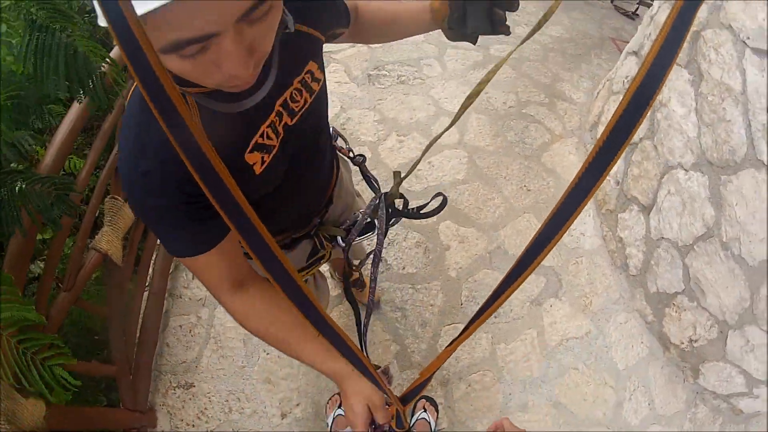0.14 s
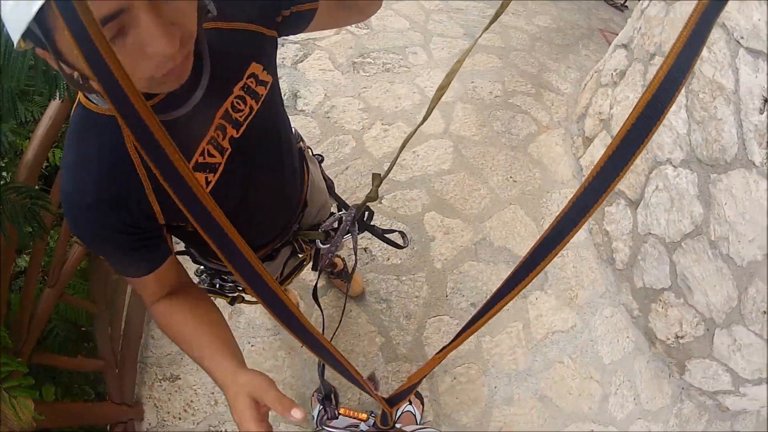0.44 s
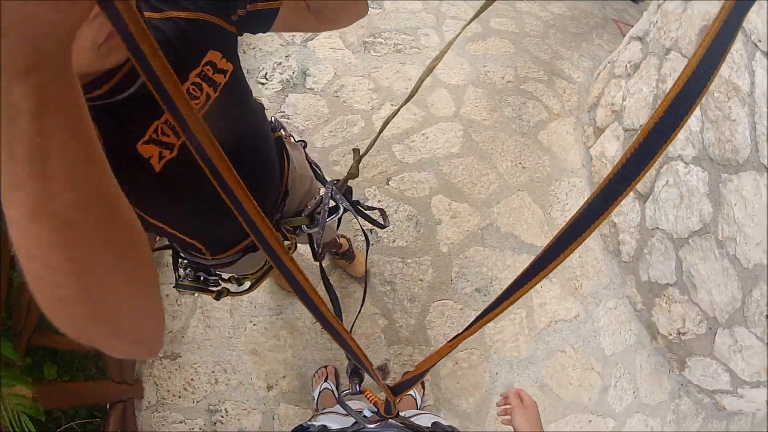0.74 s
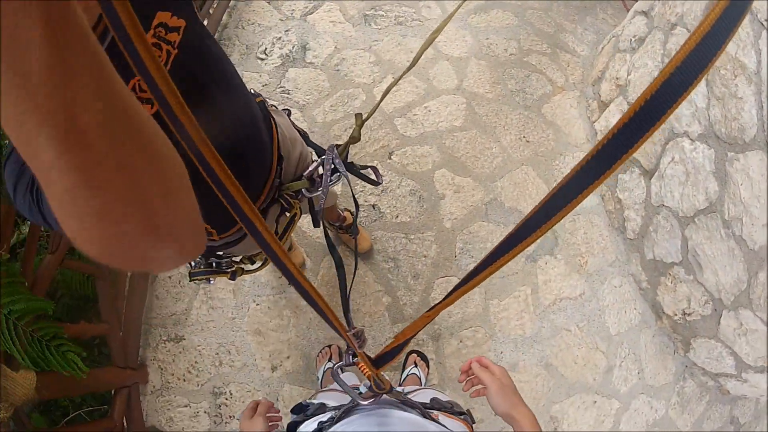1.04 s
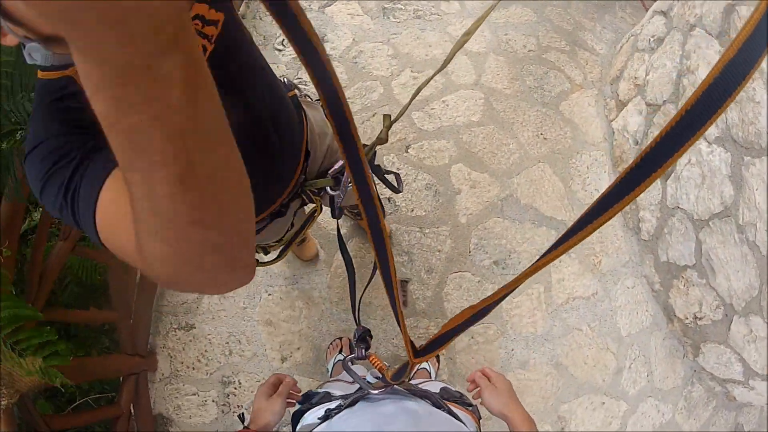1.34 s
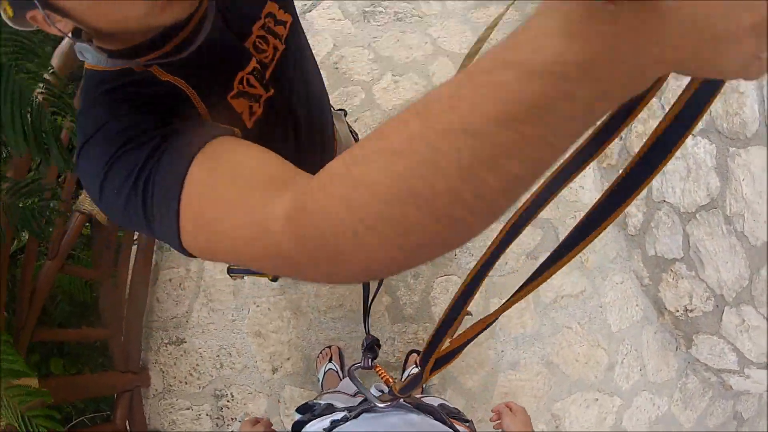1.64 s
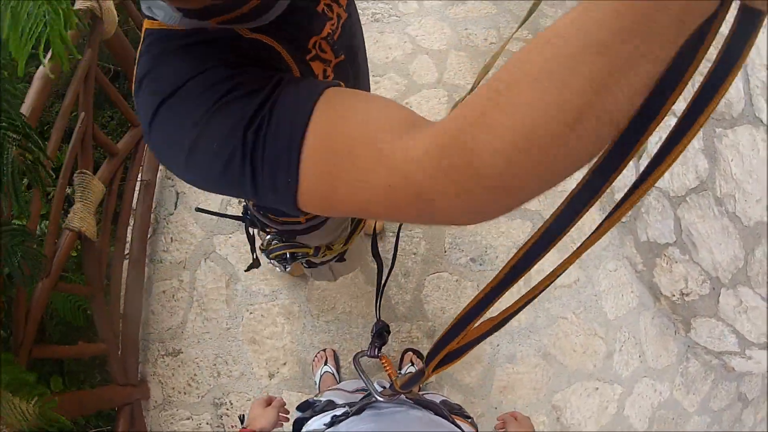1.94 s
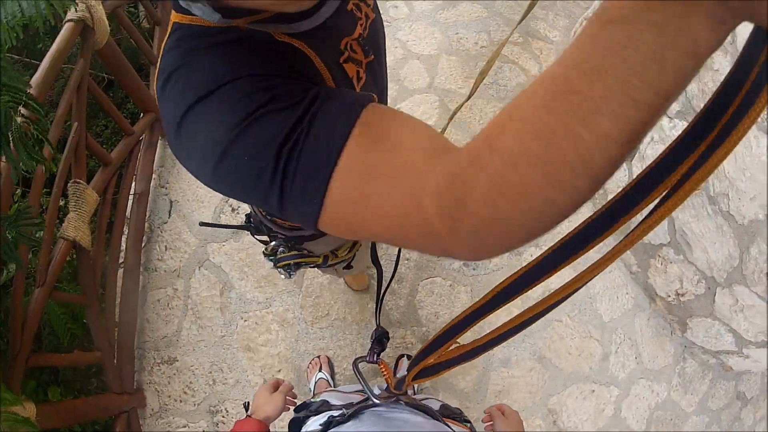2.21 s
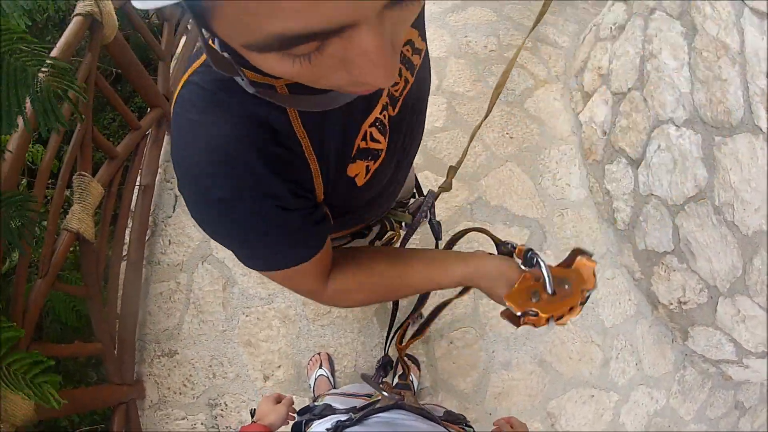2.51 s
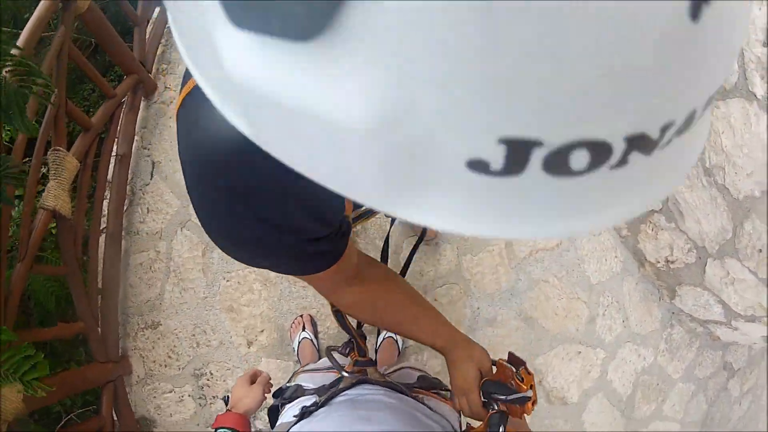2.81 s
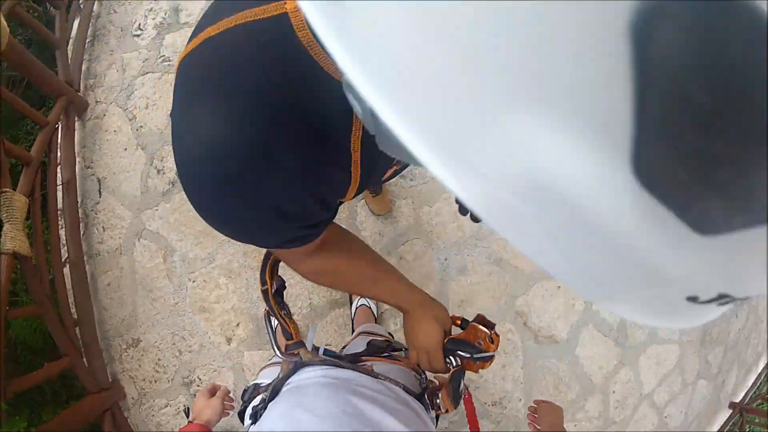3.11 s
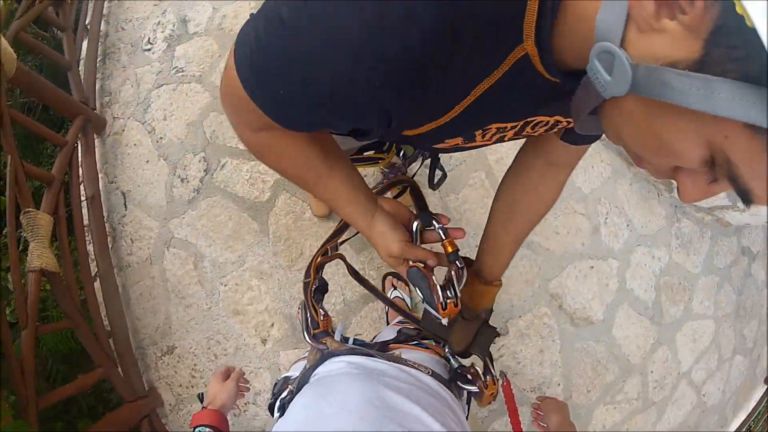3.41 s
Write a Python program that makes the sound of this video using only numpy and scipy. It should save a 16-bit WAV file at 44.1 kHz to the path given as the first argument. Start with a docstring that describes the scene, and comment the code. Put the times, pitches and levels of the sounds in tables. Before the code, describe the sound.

Metal carabiners clink irregularly as a harness is clipped up on an open stone platform. A helmet knocks loudly against the close microphone, then a pulley clacks into place. Faint wind and gear rustle lie underneath.

```python
"""A harness is clipped up for a zip line on an open stone platform, heard from a helmet camera in a case.
Faint air, wind rumble and a far whine are there from the start, and loose gear rustles. From 0.4 s
carabiners clink: each touch makes the metal ring briefly and chatter on. Near 3 s a helmet bumps the
case, overloading the microphone, then bounces and rubs off it. At 3.3 s the pulley clacks home."""
import sys
import numpy as np
from scipy import signal
from scipy.fft import rfft, irfft
from scipy.io import wavfile
from scipy.ndimage import uniform_filter1d

SR = 44100
rng = np.random.default_rng(int(sys.argv[2]) if len(sys.argv) > 2 else 0)


def put_to_file(sound):
    """Save the sound as 16-bit audio at rate SR, in the file named by the first command-line argument."""
    columns = np.atleast_2d(sound).T  # one column per channel
    safe = np.clip(columns, -1, 1)
    whole_steps = np.round(safe * 32767)
    wavfile.write(sys.argv[1], SR, whole_steps.astype(np.int16))


N = 156555

# Outdoor air heard through the case. Each row: frequency in Hz, relative level in dB.
AIR_SPECTRUM = [(130, 3.5), (220, 11.5), (310, -1), (600, -6), (1120, -2), (1450, -7.5), (1850, 1.5),
                (2200, -5.5), (2550, -13.5), (3400, -14), (3900, -18), (5250, -18), (6000, -35.5),
                (6800, -17), (7600, -23.5), (9400, -22), (10100, -13), (11400, -26.5), (12700, -29.5),
                (13900, -15.5), (15100, -28), (15700, -33)]
# How loud the four background sounds are over time. Each row: time in seconds, level in dB.
AIR_LEVELS = [(0, -56.7), (2.5, -58.5), (3.55, -57.5)]
WIND_LEVELS = [(0, -54.5), (1.5, -58.5), (1.8, -53), (2.1, -58.5), (3.55, -55)]
WHINE_LEVELS = [(0, -61.5), (1.4, -72)]
RUSTLE_LEVELS = [(0, -72), (.8, -64), (1.6, -73.5), (2.05, -67), (2.5, -80), (2.9, -71), (3.35, -67.5)]
# The metal's tones heard through the case, in five families from low to high: clack, ping, snap, ring,
# sheen. Each row of a family: frequency in Hz, relative level in dB.
METAL_TONES = {"clack": [(1200, -12.5), (1900, -2), (2150, 0)], "ping": [(2830, 0)], "snap": [(3430, 0),
               (4300, -3)], "ring": [(5080, -3), (5250, 0), (6780, -2), (7600, -10)], "sheen": [(8450, 0),
               (9130, -1), (9950, -4), (14050, -7), (14850, -3)]}
# Carabiner touches. Each row: start in seconds, a level in dB for each of the five families, then the
# chatter's level in dB relative to the touch.
CARABINER_TOUCHES = [(0.375, -22, -25, -16, -21, -23, -3), (0.612, -35, -37, -31, -46, -37, -3),
                     (0.636, -31, -24, -31, -42, -31, -6), (0.738, -24, -33, -33, -42, -33, -4),
                     (0.8855, -28, -37, -45, -52, -38, -3), (0.911, -29, -31, -38, -42, -37, -5),
                     (0.9618, -34, -37, -33, -37, -39, -5), (1.008, -28, -21, -21, -17, -26, -12),
                     (1.056, -28, -29, -32, -33, -34, -8), (1.0712, -35, -34, -31, -29, -37, -4),
                     (1.095, -32, -34, -26, -32, -33, -6), (1.113, -21, -30, -20, -28, -26, -10),
                     (1.118, -16, -15, -18, -23, -20, -10), (1.128, -16, -24, -26, -28, -26, -10),
                     (1.134, -21, -24, -23, -14, -28, -8), (1.166, -24, -22, -28, -31, -28, -9),
                     (1.215, -33, -28, -32, -37, -34, -6), (1.2835, -18, -19, -11, -24, -18, -10),
                     (1.2868, -6, -3, -6, -4, -9, -13), (1.4659, -39, -33, -26, -32, -33, -9),
                     (1.495, -35, -22, -30, -34, -29, -12), (1.7675, -27, -20, -26, -26, -27, -10),
                     (1.783, -24, -25, -29, -26, -31, -10), (1.7895, -11, -13, -14, -14, -17, -8),
                     (1.8635, -20, -25, -19, -20, -29, -10), (1.872, -17, -13, -20, -13, -20, -10),
                     (1.8825, -17, -23, -21, -13, -24, -10), (1.8888, -12, -17, -15, -6, -19, -13),
                     (1.9178, -17, -19, -17, -16, -23, -9), (1.9355, -24, -28, -35, -34, -33, -2),
                     (2.004, -26, -31, -28, -30, -32, -10), (2.0145, -24, -20, -21, -17, -25, -6),
                     (2.039, -20, -25, -20, -26, -25, -9), (2.055, -26, -43, -33, -40, -35, 5),
                     (2.068, -16, -21, -23, -20, -25, -8), (2.097, -14, -19, -21, -24, -23, -7),
                     (2.136, -29, -30, -31, -27, -35, -3), (2.2325, -14, -20, -19, -13, -23, -12),
                     (2.2485, -22, -18, -25, -17, -25, -10), (2.2565, -23, -27, -25, -22, -31, -4),
                     (2.299, -41, -42, -31, -29, -42, 3), (2.3145, -24, -30, -27, -11, -34, -16),
                     (2.3606, -29, -33, -39, -45, -38, -8), (2.6293, -37, -39, -34, -43, -39, -2),
                     (2.882, -39, -41, -39, -39, -42, -2), (3.2749, -28, -31, -35, -29, -36, -2)]
# Helmet blows on the case. Each row: start in seconds, thud level in dB, thud pitch in Hz, seconds for
# the thud to fade by 60 dB, level of the camera mount's ring in dB, crack level in dB.
HELMET_BLOWS = [(2.9754, 11, 184, .017, -15, -12.5), (2.9811, -4.5, 151, 0.014, -35, -20.5),
                (3.0081, 1, 310, .016, -16, -16)]
# The noise the case makes when touched. Each row: frequency in Hz, relative level in dB.
CASE_SPECTRUM = [(100, 3.5), (450, 9.5), (800, -2), (1000, -20), (1250, -7), (1500, -13), (2250, -4.5),
                 (4200, -25), (6000, -46), (8500, -27), (9800, -15), (10700, -28), (12000, -6.5),
                 (13200, -26), (14300, -20), (16000, -38)]
# The microphone's thin high ring when the case is knocked.
# Each row: frequency in Hz, level in dB, seconds to fade by 60 dB.
MIC_TONES = [(11950, -40, .06)]
# The mount's pitch rises as the helmet leans on it and falls as it lets go.
# Each row: time in seconds, pitch in Hz.
MOUNT_PITCHES = [(3.0, 240), (3.062, 300), (3.074, 235)]
# The pulley clacking home: one row, laid out like a carabiner touch.
PULLEY_TOUCH = (3.2958, -8, -18, -16, -10, -18, -1)

# A name with T60 is the time a sound takes to fade by 60 dB.
CONTACT_S, BOUNCE_S, RING_T60_S = .0009, .0017, .045
CARABINER_T60_S, PULLEY_T60_S, PLATFORM_T60_S = .052, .1, .18
MOUNT_T60_S, CRACK_T60_S, RATTLE_T60_S = .11, .016, .1


def undb(db):
    """Turn decibels into a gain."""
    return 10 ** (np.asarray(db) / 20)


def unit(x):
    """Scale to an average power of 1."""
    return x / np.sqrt(np.mean(x ** 2))


def norm(x):
    """Scale to a total energy of 1."""
    return x / np.sqrt(np.sum(x ** 2))


def fade(t, t60):
    """Die away by 60 dB every t60 seconds."""
    return np.exp(-np.log(1000) * t / t60)


def swell(t, rise_s, fall_s):
    """Grow until t = 0, then die away."""
    return np.exp(np.minimum(t / rise_s, -t / fall_s))


def follow(t, table):
    """Join a table's (time, value) rows with straight lines."""
    return np.interp(t, *np.array(table).T)


def add(out, start, x):
    """Mix x in at start seconds."""
    i = int(start * SR)
    out[i:i + len(x)] += x[:N - i]


def low_noise(hz, order=1):
    """Noise that weakens above hz."""
    return signal.sosfilt(signal.butter(order, hz, fs=SR, output="sos"), rng.standard_normal(N))


def band_noise(hz, width_hz):
    """Noise gathered around one pitch."""
    band = signal.butter(2, [hz - width_hz / 2, hz + width_hz / 2], "band", fs=SR, output="sos")
    return unit(signal.sosfilt(band, rng.standard_normal(N)))


def shaped_noise(spectrum):
    """Noise shaped by (Hz, dB) rows."""
    hz, db = np.array(spectrum).T
    freqs = np.maximum(np.fft.rfftfreq(N, 1 / SR), 1)
    gains = undb(np.interp(np.log(freqs), np.log(hz), db))
    return unit(irfft(rfft(rng.standard_normal(N)) * gains, N))


def wander(per_s):
    """A smooth random drift, about 1 in size."""
    hold = int(SR / per_s)
    steps = np.repeat(rng.standard_normal(N // hold + 1), hold)
    return unit(uniform_filter1d(uniform_filter1d(steps, hold), hold)[:N])


def outdoors(t):
    """Steady air, wind rumbling on the case, a far whine that fades and one brief low hum."""
    air = shaped_noise(AIR_SPECTRUM) * undb(follow(t, AIR_LEVELS) + .43 * wander(15))
    wind = unit(low_noise(hz=43.6, order=2)) * undb(follow(t, WIND_LEVELS) + .5 * wander(4.7))
    hum_hz = 218 * (1 + .0388 * wander(50.9))
    hum_shape = np.exp(-((t - 1.39) / .041) ** 2 / 2)  # peaks at 1.39 s
    hum = np.sin(2 * np.pi * np.cumsum(hum_hz) / SR) * hum_shape
    whine = band_noise(hz=1088, width_hz=100) * undb(follow(t, WHINE_LEVELS))
    return air + wind + whine + undb(-50 + 2 * wander(39.5)) * hum


def metal_ring(push, levels_db):
    """Pushed metal held in the hand: each tone sounds for a few milliseconds and leaves a faint ring."""
    t = np.arange(SR // 12) / SR
    contact = np.exp(-t / CONTACT_S)
    shape = t / CONTACT_S * contact + undb(-27) * fade(t, RING_T60_S) * (1 - contact)
    out = 0
    for family, level_db in zip(METAL_TONES.values(), levels_db):
        hz, db = np.array(family).T
        size, detune, phase = rng.standard_normal((3, len(hz)))  # no two touches sound alike
        tones = shape * np.sin(2 * np.pi * (np.outer(hz * (1 + .009 * detune), t) + phase[:, None]))
        ringing = signal.fftconvolve(push[None], tones, axes=1)
        blend = sum(gain * norm(x) for gain, x in zip(undb(db + 1.5 * size), ringing))
        out = out + undb(level_db) * norm(blend)
    return out


def gear_rustle(t):
    """Loose gear jostles: about 900 tiny ticks a second set the metal ringing."""
    ticks = (rng.random(N) < 900 / SR) * rng.uniform(-1, 1, N)
    usual_db = np.mean([row[1:-1] for row in CARABINER_TOUCHES], axis=0)
    return unit(metal_ring(ticks, usual_db)[:N]) * undb(follow(t, RUSTLE_LEVELS))


def platform_echo(t, gear):
    """The stone scatters the gear's sound back as a short, duller echo."""
    scatter = norm(low_noise(hz=5000) * fade(t, PLATFORM_T60_S))
    return undb(-22) * signal.fftconvolve(gear, scatter)[:N]


def clinks(touches, chatter_t60):
    """Each touch and its quick bounces ring the metal; the parts then chatter against each other."""
    out = np.zeros(N)
    t = np.arange(SR // 12) / SR
    for start, *levels_db, chatter_db in touches:
        bounces, shake = rng.standard_normal((2, len(t)))
        push = undb(1) * norm(bounces ** 3 * np.exp(-t / BOUNCE_S))
        push[0] += 1  # the first hit
        shake *= fade(t, chatter_t60) * (1 - np.exp(-(t / BOUNCE_S) ** 2 / 10))
        duller_db = levels_db - 1.2 * np.arange(len(levels_db))  # higher families chatter less
        add(out, start, metal_ring(push, levels_db) + undb(chatter_db) * metal_ring(shake, duller_db))
    return out


def mount_phase(t):
    """How far the camera mount has gone through its swings, in radians."""
    return 2 * np.pi * np.cumsum(follow(t, MOUNT_PITCHES)) / SR


def helmet_bumps(t):
    """Each blow thuds and cracks through the case, and sets the microphone and the mount ringing."""
    out = np.zeros(N)
    mic_ring = sum(undb(db) * np.sin(2 * np.pi * hz * t) * fade(t, t60) for hz, db, t60 in MIC_TONES)
    thud_rise = 1 - np.exp(-t / .0005)
    crack_shape = fade(t, CRACK_T60_S) + undb(-17.5) * fade(t, RATTLE_T60_S)
    for start, thud_db, hz, t60, mount_db, crack_db in HELMET_BLOWS:
        thud = undb(thud_db) * np.sin(2 * np.pi * hz * t) * fade(t, t60) * thud_rise
        mount = undb(mount_db) * np.sin(mount_phase(start + t)) * fade(t, MOUNT_T60_S)
        crack = undb(crack_db) * shaped_noise(CASE_SPECTRUM) * crack_shape
        add(out, start, crack + mic_ring - thud - mount)
    return out


def helmet_rub(t):
    """The helmet slides off: the mount judders and the surface scrapes."""
    press = np.tanh(2 * swell(t - 3.074, rise_s=.0036, fall_s=.003))
    phase = mount_phase(t)
    octave = undb(-11) * press ** 2 * np.sin(2 * phase)  # makes the judder lopsided
    judder = press * np.sin(phase) + octave
    scrape = undb(-24) * shaped_noise(CASE_SPECTRUM)
    grind = undb(-28) * band_noise(hz=660, width_hz=380)
    return undb(-10.5) * judder + (scrape + grind) * swell(t - 3.080, rise_s=.0095, fall_s=.0035)


def scene():
    """Mix all the sounds into one channel."""
    t = np.arange(N) / SR
    background = outdoors(t)
    helmet = helmet_bumps(t) + helmet_rub(t)
    carabiners = clinks(CARABINER_TOUCHES, CARABINER_T60_S)
    pulley = clinks([PULLEY_TOUCH], PULLEY_T60_S)
    gear = gear_rustle(t) + carabiners + pulley
    return (background + gear + platform_echo(t, gear) + helmet)[None]


def record(dry):
    """The microphone overloads on the bumps, has a narrow dip in the middle and loses the top treble."""
    dip_hz, dip_width_hz, top_hz = 990, 80, 15400
    clipped = np.clip(dry, -.5, .5)
    dipped = signal.lfilter(*signal.iirnotch(dip_hz, dip_hz / dip_width_hz, fs=SR), clipped)
    return signal.sosfilt(signal.ellip(8, .2, 70, top_hz, fs=SR, output="sos"), dipped)


dry = scene()
out = record(dry)
put_to_file(out)
```